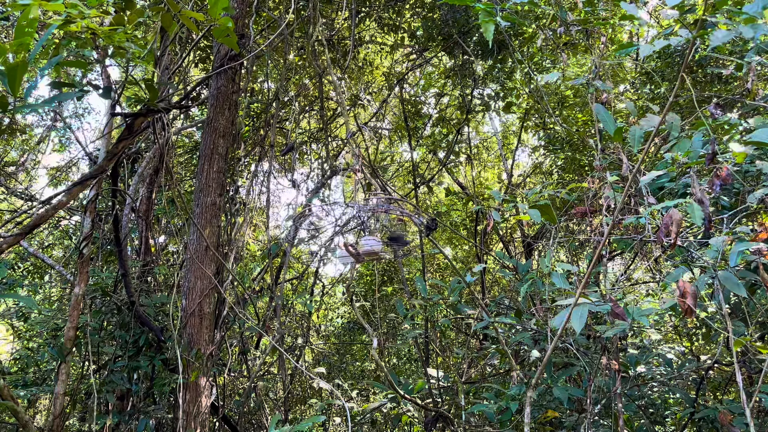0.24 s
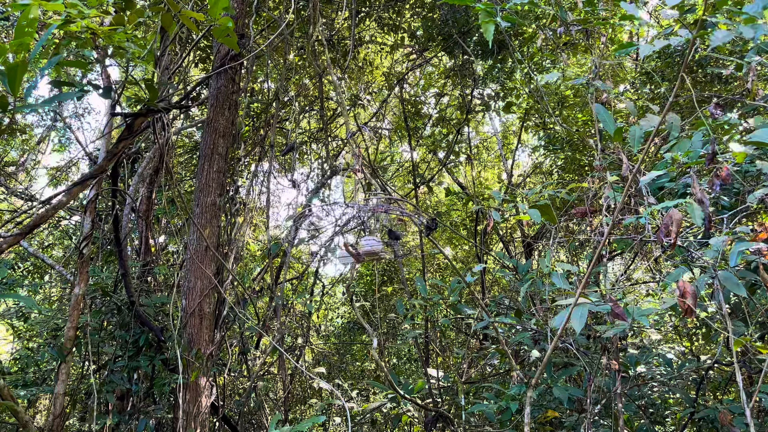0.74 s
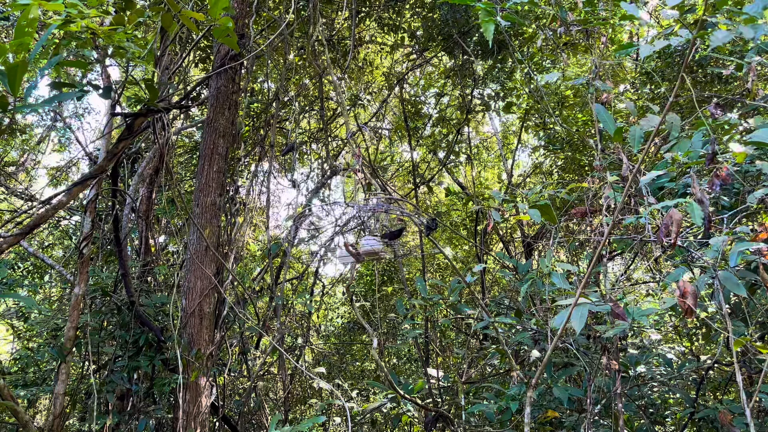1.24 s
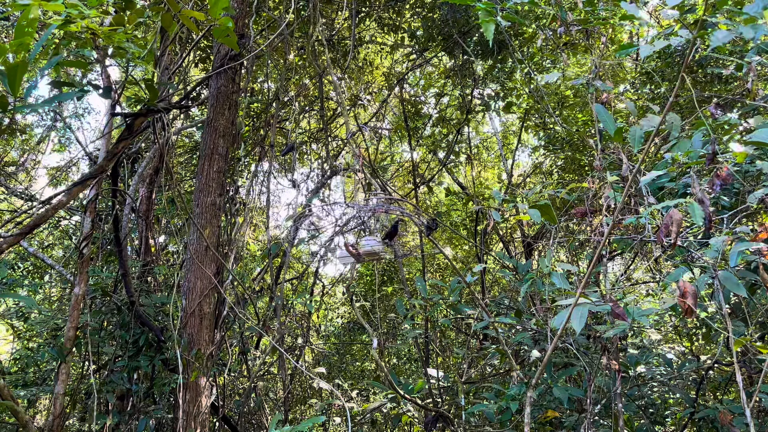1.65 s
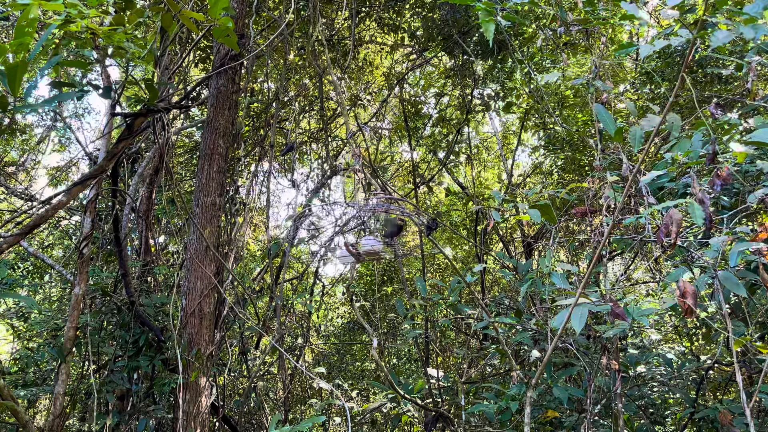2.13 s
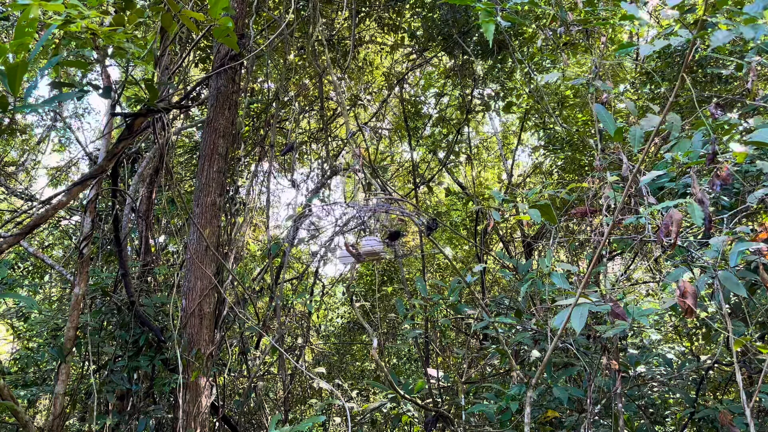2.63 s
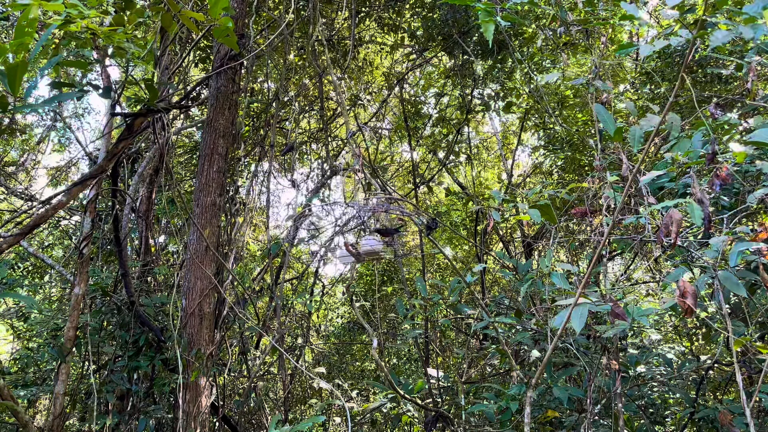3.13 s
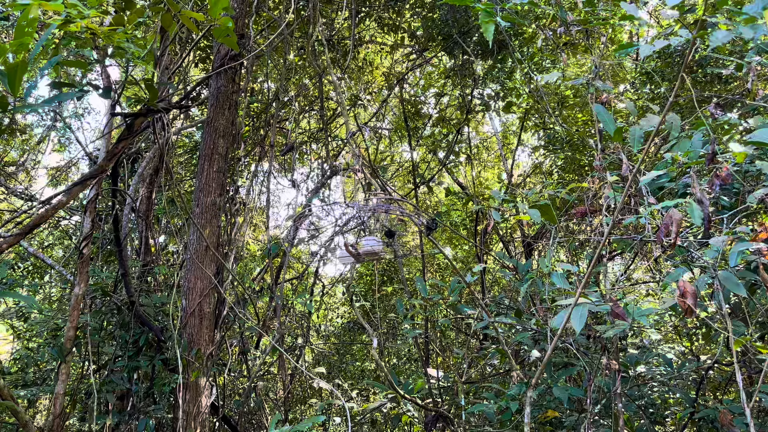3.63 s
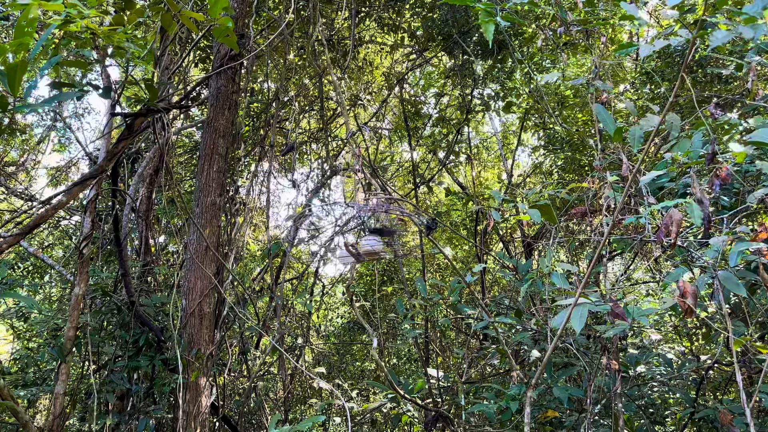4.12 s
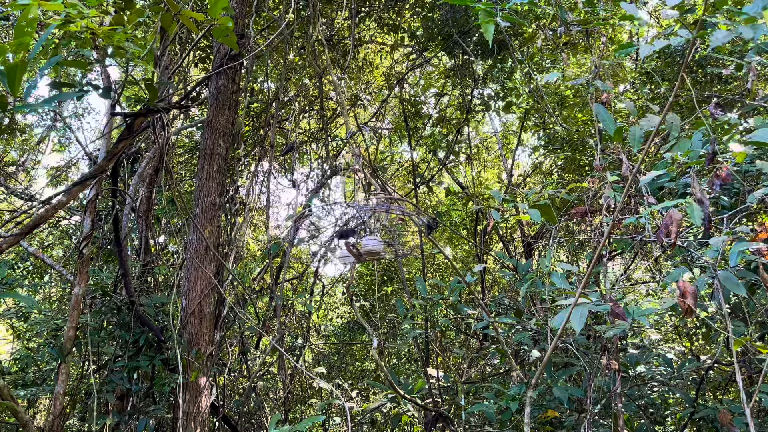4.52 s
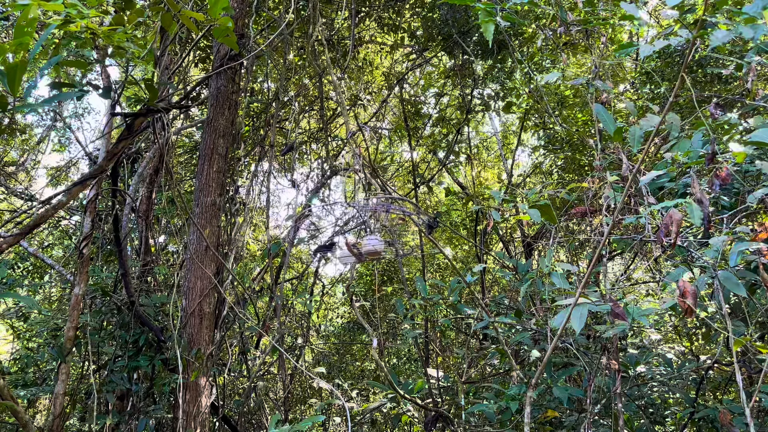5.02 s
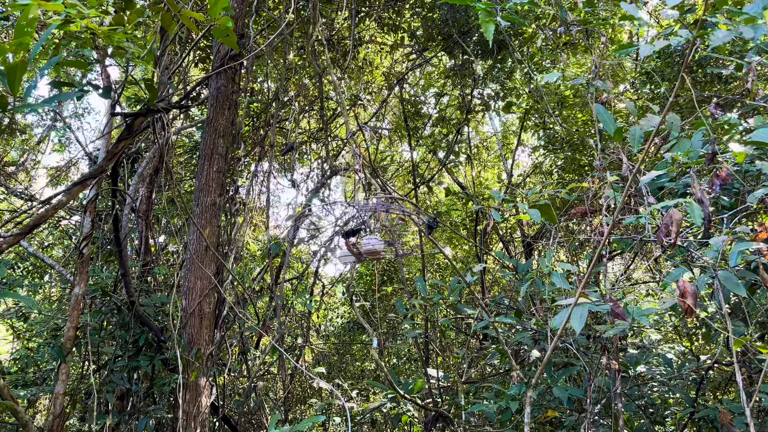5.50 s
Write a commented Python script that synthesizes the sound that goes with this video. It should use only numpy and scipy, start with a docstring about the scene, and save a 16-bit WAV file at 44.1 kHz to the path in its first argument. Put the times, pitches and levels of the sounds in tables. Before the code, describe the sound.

A continuous bed of bright cricket trills, mostly left, thickens as another cricket joins after two seconds and a thin faint one later. Over it come short, sliding bird chirps, clustered at the start and sparser afterwards, with a raspy squeal late on. Foliage scatters the calls in short echoes. Underneath are a low, steady far-off engine drone, quiet leafy hush and tiny dry ticks.

```python
"""A thicket: four crickets trill at about five chirps a second, two of them joining late, over a far chorus.
Each chirp is two wing strokes of falling pitch. A small bird's syrinx glides through a twittering phrase four
times, with single calls between and one squeal; a far bird whistles and hoots in wavering sines. Twigs tick,
leaves rustle and wings flutter in shaped noise. Leaves and trunks scatter the calls as random echoes. A far
motor's blurred partials drone under it all, with noise for the rumble and the hush of foliage."""
import sys
import numpy as np
from scipy import signal
from scipy.fft import rfft, irfft, next_fast_len
from scipy.io import wavfile
from scipy.ndimage import uniform_filter1d, map_coordinates

SR = 44100
rng = np.random.default_rng(int(sys.argv[2]) if len(sys.argv) > 2 else 0)


def file_out(sig):
    """Save sig as 16-bit WAV at sys.argv[1]."""
    # one column per channel
    cols = np.atleast_2d(sig).T
    # limit, then scale
    lim = np.clip(cols, -1, 1)
    pcm = np.round(lim * 32767).astype(np.int16)
    wavfile.write(sys.argv[1], SR, pcm)


N = 254016


def amp(db):
    """Decibels to gain."""
    return 10 ** (np.asarray(db) / 20)


def unit(x):
    """Scale to rms 1."""
    return x / np.sqrt(np.mean(x ** 2) + 1e-20)


def along(points, hz):
    """Interpolate (Hz, value) points on a log frequency axis."""
    f, v = np.transpose(points)
    return np.interp(np.log(hz + 1), np.log(f), v)


def curve(rows):
    """One value per sample from (s, value) rows."""
    return np.interp(np.arange(N) / SR, *np.transpose(rows))


def wobble(rate_hz, size):
    """Smooth random curve with rate_hz knots a second."""
    knots = rng.standard_normal(int(size * rate_hz / SR) + 4)
    return map_coordinates(knots, [np.arange(size) * rate_hz / SR])


def filtered(x, response):
    """Filter x by a gain that is a function of frequency."""
    m = next_fast_len(N + SR // 2)
    return irfft(rfft(x, m) * response(np.fft.rfftfreq(m, 1 / SR)), m)[..., :N]


def add(track, s, sound):
    """Mix a sound into the track from time s."""
    start = max(round(s * SR), 0)
    part = track[..., start:start + sound.shape[-1]]
    part += sound[..., :part.shape[-1]]


def panned(x, left_db):
    """Make the left channel louder than the right by left_db."""
    return x * amp([[left_db / 2], [-left_db / 2]])


def noise(spectrum, side_db, left_db):
    """Coloured stereo noise of rms 1, from independent mid and side."""
    mid, side = filtered(rng.standard_normal((2, N)), lambda hz: amp(along(spectrum, hz)))
    side = amp(side_db) * side
    return unit(panned(np.array([mid + side, mid - side]), left_db))


def thicket(call, left_db, lag_samples, leaves_db, trunks_db,
            leaves_t60_s=0.098, trunks_t60_s=0.37, echo_left_db=6.0):
    """Direct path, lagging on the right, plus sparse short leaf echoes and a denser, longer trunk wash."""
    t = np.arange(SR // 2) / SR
    paths = np.zeros((2, len(t)))
    for level_db, t60_s, echoes_per_s in ((leaves_db, leaves_t60_s, 1800), (trunks_db, trunks_t60_s, 6000)):
        echoes = rng.standard_normal(paths.shape) * (rng.random(paths.shape) < echoes_per_s / SR)
        echoes *= amp(-60 * t / t60_s) * (1 - np.exp(-t / (t60_s / 40)))
        paths += amp(level_db) * echoes / np.linalg.norm(echoes, axis=1, keepdims=True)
    direct = np.zeros_like(paths)
    direct[0, 0] = direct[1, lag_samples] = 1
    response = panned(direct, left_db) + panned(paths, echo_left_db)
    return signal.fftconvolve(call[None], response, axes=1)


def background():
    """Far motor partials, each blurred by the way through the wood, over rumble and foliage hush."""
    # motor partials: f/Hz, level/dB
    drone_partials = [(54, -5), (78, -5.5), (108, -8), (133, -11.5), (165, -13), (188, -18.5), (215, -32)]
    # noise spectra of the rumble and of the foliage: f/Hz, level/dB
    rumble_spectrum = [(15, -31.5), (28, -15), (40, -12.5), (52, 2), (85, -0.5), (115, -6.5), (170, -11.5),
                       (240, -21.5), (330, -35), (520, -40.5), (880, -120)]
    air_spectrum = [(100, -1), (250, -0.5), (450, -1.04), (800, -8), (1400, -7.5), (2000, -13),
                    (2800, -15.5), (6000, -4), (9000, -23), (15000, -27.5)]
    start_db, rise_db_per_s = -56.5, 0.09
    t = np.arange(N) / SR
    drone = 0
    for hz, db in drone_partials:
        blur = wobble(11, N) + 1j * wobble(11, N)
        drone = drone + amp(db) * unit(np.real(blur * np.exp(2j * np.pi * hz * t)))
    rumble = amp(-2.0) * noise(rumble_spectrum, side_db=-8.0, left_db=0.0)
    low = amp(start_db + rise_db_per_s * t) * (panned(drone, left_db=4.5) + rumble)
    breeze_db = .8 * wobble(5, N)
    air = amp(-68.5 + breeze_db) * noise(air_spectrum, side_db=1.5, left_db=5.0)
    return low + air


def stroke(t, pitch_hz, fall_hz, width_s, octave_db=-27):
    """One wing closure: the file slows, so pitch falls fall_hz per width_s; its teeth catch unevenly."""
    scrape_db, scrape_radians = 1.6, .22
    u = t / width_s
    slip, grip, edge = (wobble(600, len(t)) for _ in range(3))
    phase = 2 * np.pi * (pitch_hz * t - fall_hz * t * u / 2 + rng.random()) + scrape_radians * slip
    second_db = octave_db + 2.8 * edge - 2 * np.clip(u, -1, 2)
    tone = np.sin(phase) + amp(second_db) * np.sin(2 * phase)
    tone += amp(octave_db - 18) * np.sin(3 * phase)
    envelope = np.exp(-np.abs(u) ** np.where(u < 0, 1.8, 2.3) / 2)
    return tone * amp(scrape_db * grip) * envelope


def far_crickets(count=300):
    """Overlapping strokes from deeper in the wood stand out of a shimmering band of noise."""
    # chorus level: t/s, level/dB
    chorus_db = [(0, -58.5), (1, -56.5), (2, -59.5), (2.6, -59.5), (3.3, -57), (4.2, -57), (5.76, -56)]
    # chorus noise spectrum: f/Hz, level/dB
    chorus_spectrum = [(3300, -44.5), (3900, -13), (4250, -2.5), (4550, -4), (4950, -7), (5500, -16.5),
                       (6500, -44.5), (7500, -26.5), (8900, -25), (10500, -39.5), (14000, -43.5),
                       (17000, -63)]
    strokes, t = np.zeros(N), np.arange(-SR // 80, SR // 80) / SR
    for turn, (when, tune, near) in enumerate(rng.random((count, 3))):
        far = amp(3 + 8 * near ** 3) * stroke(t, 4300 + 650 * tune, fall_hz=200, width_s=.002)
        add(strokes, (turn + when) / count * N / SR, far)
    level_db = curve(chorus_db)
    shimmer_db = 2.8 * wobble(60, N)
    blur = amp(level_db + shimmer_db) * noise(chorus_spectrum, side_db=1, left_db=3.5)
    scattered = thicket(strokes * amp(level_db), left_db=6, lag_samples=10, leaves_db=-6, trunks_db=-12)
    return blur + scattered[:, :N]


def cricket(chirps, left_db, leaves_db, trunks_db, pitch_hz, fall_hz, width_s,
            lead_s, lead_db, lead_hz, octave_db):
    """Each chirp is a short lead stroke then a full stroke, randomly varied in pitch, gap, force and fall."""
    out = np.zeros((2, N))
    before_s = .03
    t = np.arange(-before_s, before_s, 1 / SR)
    for s, db in chirps:
        tune, gap, lead_force, slowing = rng.standard_normal(4)
        drift = 1 + 0.011 * tune
        fall = fall_hz * (1 + .15 * slowing)
        lead_t = t + lead_s + 0.000518 * gap
        lead = amp(lead_db + lead_force) * stroke(lead_t, lead_hz * drift, fall, width_s * 0.71, octave_db)
        full = stroke(t, pitch_hz * drift, fall, width_s, octave_db)
        add(out, s - before_s, thicket(amp(db) * (lead + full), left_db, 15, leaves_db, trunks_db))
    return out


def near_crickets():
    """High, steady, late slowing sharp, and even thin cricket: each file has its own pitch, and the sharp and
    thin share a steeper fall."""
    # chirps of each cricket: t/s, level/dB
    high_chirps = [(.076, -39.5), (.266, -37.5), (.457, -40), (.647, -39), (.862, -36), (1.066, -38),
                   (1.258, -39.5), (1.448, -38.5), (1.637, -37.5), (1.830, -38), (2.023, -36.5),
                   (2.217, -35.5), (2.407, -35), (2.612, -36.5), (2.806, -35), (3.010, -38.5),
                   (3.205, -38.5), (3.397, -34), (3.598, -44), (3.802, -41.5), (3.997, -37), (4.195, -39),
                   (4.412, -39), (4.618, -40), (4.856, -40), (5.055, -38), (5.267, -39), (5.460, -39),
                   (5.660, -39.5)]
    steady_chirps = [(.118, -34.5), (.310, -33.5), (.519, -36), (.731, -34), (.943, -35.5), (1.127, -34.5),
                     (1.312, -36.5), (1.496, -34.5), (1.686, -34.5), (1.881, -34), (2.087, -37),
                     (2.268, -35.5), (2.444, -35.5), (2.628, -35), (2.821, -35), (3.005, -33), (3.200, -35),
                     (3.388, -32), (3.587, -37), (3.797, -32.5), (3.980, -35.5), (4.176, -35.5),
                     (4.372, -35.5), (4.575, -35), (4.771, -34.5), (4.956, -35), (5.141, -37), (5.332, -34),
                     (5.523, -34), (5.721, -34.5)]
    sharp_chirps = [(2.147, -41), (2.338, -39.5), (2.572, -40.5), (2.784, -39), (2.987, -40),
                    (3.190, -38.5), (3.378, -47), (3.584, -38), (3.784, -40.5), (4.008, -37.5),
                    (4.215, -38), (4.430, -37.5), (4.687, -38), (4.926, -37), (5.138, -37), (5.385, -37.5),
                    (5.654, -37.5)]
    thin_chirps = [(3.5 + beat * 0.21, -51) for beat in range(13)]
    high = cricket(high_chirps, left_db=3.0, leaves_db=-5, trunks_db=-7,
                   pitch_hz=4760, fall_hz=200, width_s=.0025,
                   lead_s=.0145, lead_db=-3, lead_hz=4730, octave_db=-28.5)
    steady = cricket(steady_chirps, left_db=9.5, leaves_db=-7, trunks_db=-15,
                     pitch_hz=4400, fall_hz=180, width_s=.0034,
                     lead_s=.0158, lead_db=-3.5, lead_hz=4398, octave_db=-27)
    sharp = cricket(sharp_chirps, left_db=18.0, leaves_db=-5, trunks_db=-10,
                    pitch_hz=4380, fall_hz=280, width_s=.0022,
                    lead_s=.0145, lead_db=-5.0, lead_hz=4200, octave_db=-21)
    thin = cricket(thin_chirps, left_db=-1, leaves_db=-5, trunks_db=-3.5,
                   pitch_hz=5100, fall_hz=280, width_s=.0022,
                   lead_s=.017, lead_db=-13.5, lead_hz=5100, octave_db=-34.0)
    return high + steady + sharp + thin


def song():
    """Every note the bird sings: (s, shape, pitch ratio, length ratio, extra dB)."""
    # calls outside the phrase: t/s, shape, length ratio
    single_calls = [(.27, "fall", 0.92), (.385, "sweep", 0.94), (0.719, "sweep", 0.74),
                    (1.092, "sweep", 0.84), (3.505, "sweep", 0.75), (4.685, "squeal", 0.99),
                    (4.703, "screech", 0.98)]
    # phrases: t/s, chip delay/s, arch pitch ratio, rattle level/dB
    phrases = [(.479, .136, 1, -12), (.847, .151, 1.01, -2), (1.860, .150, .91, 0), (3.270, .142, .97, 0)]
    whistle_after_s, tick_lead_s, flick_lead_s = 0.026, .055, .043
    notes = [(s, shape, 1, length, 0) for s, shape, length in single_calls]
    for s, chip_after_s, arch_pitch, rattle_db in phrases:
        chip_s = s + chip_after_s
        notes += [(s, "arch", arch_pitch, 1, 0),
                  (s + whistle_after_s, "whistle", 1, 1, 0),
                  (chip_s - tick_lead_s, "tick", 1, 1, rattle_db),
                  (chip_s - flick_lead_s, "flick", 1, 1, rattle_db),
                  (chip_s, "chip", 1, 1, 0)]
    return notes


def bird_note(shape, pitch, length, rasp, low_db, count=5):
    """Syrinx glide: rasp shakes pitch and strength and adds husk; the throat colours the harmonics."""
    # note shapes by name, before pitch and length ratios: t/s from note start, f/Hz, level/dB
    note_shapes = { "arch": [(0, 2586, -14), (.009, 2911, 3.5), (.015, 2680, -4.5), (.022, 1680, -8)],
                   "whistle": [(0, 2860, -12.5), (.006, 3293, -5.5), (.016, 3480, -2), (.026, 3530, -7)],
                   "tick": [(0, 2934, -7), (.006, 2198, -2.5), (.016, 1050, -12.5)],
                   "flick": [(0, 1306, -8), (.005, 2577, -4.5), (.014, 3150, -10)], "chip": [(0, 1945, -7),
                   (.003, 3375, -4.5), (.007, 4790, 1.5), (.010, 3436, -4), (.014, 2150, -9.5),
                   (.026, 1940, -13)], "sweep": [(0, 3230, -9.5), (.014, 2992, -2.5), (.019, 3130, -1),
                   (.024, 4324, 4.5), (.028, 5400, -1.5), (.032, 6350, 1.5)], "fall": [(0, 2750, -6),
                   (.015, 2400, -2.5), (.024, 2000, -5.5), (.031, 1506, 0.5)], "squeal": [(0, 2377, -19),
                   (.014, 2613, -3), (.027, 2932, -1.5), (.037, 3697, 0), (.055, 4600, -4.5),
                   (.061, 5760, -4), (.069, 6450, -1.5), (.084, 6495, -10)], "screech": [(0, 4424, -4),
                   (.010, 5500, 0), (.025, 6100, -0.5), (.042, 6700, -3.5)], }
    # throat response: f/Hz, level/dB
    throat = [(1200, -17), (2200, -13), (3200, -5.5), (4500, -3), (6000, 0.5), (7000, 1), (8300, -1),
              (10000, -9), (15000, -11)]
    # husk noise spectrum: f/Hz, level/dB
    husk_spectrum = [(900, -25.5), (2400, -19.5), (4500, 3.5), (7000, 5), (10000, -1), (15000, -13.5)]
    # low_db applies in full below the first, fades out by the second: f/Hz, f/Hz
    low_tones_hz = (3180, 5600)
    husk_db, husk_rasp_db = -24.5, 17  # clean note, and rise at full rasp
    s, shape_hz, shape_db = np.transpose(note_shapes[shape])
    size = int(s[-1] * length * SR)
    t = np.arange(size) / SR
    hz = uniform_filter1d(np.interp(t / length, s, shape_hz), size=110, mode="nearest") * pitch
    phase = 2 * np.pi * np.cumsum(hz * (1 + 0.15 * rasp * wobble(2400, size))) / SR
    step_db = np.interp(hz, [2500, 3400, 6000], [1.5, 4.3, 13])  # high notes are purer
    tone = np.zeros(size)
    for k in range(1, count + 1):
        colour_db = along(throat, k * hz) + np.interp(k * hz, low_tones_hz, [low_db, 0])
        audible = k * hz < SR / 2
        harmonic = np.sin(k * phase + 2 * np.pi * rng.random())
        tone += amp(colour_db - step_db * (k - 1)) * audible * harmonic
    husk_gain = amp(along(husk_spectrum, np.fft.rfftfreq(size, 1 / SR)))
    husk = unit(irfft(rfft(rng.standard_normal(size)) * husk_gain, size))
    strength_db = np.interp(t / length, s, shape_db) + 4.4 * rasp * wobble(1800, size)
    voice = tone + amp(husk_db + husk_rasp_db * rasp) * husk
    return voice * amp(strength_db) * signal.windows.tukey(size, .15)


def bird():
    """Syrinx notes a little left of centre, scattered by leaves and trunks."""
    # voicing by note name: level/dB, rasp 0-1, low tones against overtones/dB
    voicing = {"arch": (-41.5, 0.15, -0.48), "whistle": (-39, 0.15, 0.94), "tick": (-47, 1, 3.3),
               "flick": (-42.5, .8, 2), "chip": (-36, 0.29, 0), "sweep": (-38.5, 0.084, -1.3),
               "fall": (-44.5, 0.18, 1), "squeal": (-33, 0.41, -10.5), "screech": (-40.5, 0.73, 0)}
    out = np.zeros((2, N))
    for s, shape, pitch, length, extra_db in song():
        db, rasp, low_db = voicing[shape]
        note = amp(db + extra_db) * bird_note(shape, pitch, length, rasp, low_db)
        add(out, s, thicket(note, left_db=2.5, lag_samples=0, echo_left_db=3.0, leaves_db=-3.8,
                            trunks_db=-12, leaves_t60_s=.11, trunks_t60_s=.7))
    return out


def far_bird():
    """Soft sine whistles and hoots of wavering pitch, half lost in their echo."""
    # whistles and low hoots: t/s, length/s, f/Hz, level/dB
    far_calls = [(1.5, 0.18, 398.3, -74), (1.65, 0.092, 321, -68), (1.55, 0.6, 1216, -81),
                 (4.05, .75, 1303, -83), (5.35, 0.08, 1520, -75), (5.42, 0.13, 1524, -66),
                 (5.52, 0.22, 1537, -76), (5.715, 0.07, 1840, -72)]
    out = np.zeros((2, N))
    for s, length_s, hz, db in far_calls:
        size = int(length_s * SR)
        phase = 2 * np.pi * np.cumsum(hz * (1 + 0.012 * wobble(120, size))) / SR
        whistle = amp(db) * np.hanning(size) * np.sin(phase)
        add(out, s, thicket(whistle, left_db=4, lag_samples=0, leaves_db=-4, trunks_db=-2))
    return out


def rustles():
    """Brushed leaves and a bird's fluttering wings: noise that swells and fades in a crinkling flutter."""
    # rustles: t/s, length/s, level/dB; the first two are brushed leaves, the last two wing flutter
    rustle_rows = [(2.626, 0.076, -73), (2.858, 0.067, -66), (5.126, 0.14, -65.5), (5.626, 0.1, -68)]
    # rustle noise spectrum: f/Hz, level/dB
    rustle_spectrum = [(300, -8), (900, -2), (2400, -4.5), (5000, -5.5), (12000, -17)]
    touch = np.zeros(N)
    for s, length_s, db in rustle_rows:
        add(touch, s, amp(db) * np.hanning(int(length_s * SR)))
    flutter = amp(4 * wobble(220, N))
    return touch * flutter * noise(rustle_spectrum, side_db=-2, left_db=3)


def twigs():
    """Dry ticks: an impulse and decaying noise through a broad band, faintly scattered."""
    # ticks: t/s, level/dB (peak is 8 dB above), f/Hz, 60 dB decay/s
    ticks = [(2.652, -54, 2000, .007), (2.662, -61.5, 2300, .008), (2.893, -55.5, 1700, 0.011),
             (4.175, -47, 2300, 0.0078), (4.185, -57, 1800, .007), (5.2, -62, 1500, .007),
             (5.433, -44, 8500, 0.0096)]
    out, t = np.zeros((2, N)), np.arange(SR // 10) / SR
    for s, db, hz, t60_s in ticks:
        band = signal.butter(1, [hz * .4, min(hz * 1.4, SR / 2 - 1)], "bandpass", fs=SR)
        snap = rng.standard_normal(len(t)) * amp(-60 * t / t60_s)
        snap[0] = 6
        tick = signal.lfilter(*band, snap)
        tick *= amp(db + 8) / np.abs(tick).max()
        add(out, s, thicket(tick, left_db=3, lag_samples=0, leaves_db=-5, trunks_db=-12))
    return out


def scene():
    """Sum of the drone and air, crickets, birds, rustles and twigs."""
    insects = far_crickets() + near_crickets()
    birds = bird() + far_bird()
    return background() + insects + birds + rustles() + twigs()


def record(dry):
    """Microphone response, dull in parts of the treble, with a sharp upper band limit."""
    # microphone response: f/Hz, level/dB
    microphone = [(20, 1.5), (6700, -1), (7250, -13), (7900, -2), (9600, -2.5), (10300, -10), (10900, -29),
                  (11900, -25), (12700, -6), (13700, 3)]
    top_hz = 15850
    return filtered(dry, lambda hz: amp(along(microphone, hz)) * (hz < top_hz))


dry = scene()
out = record(dry)
file_out(out)
```